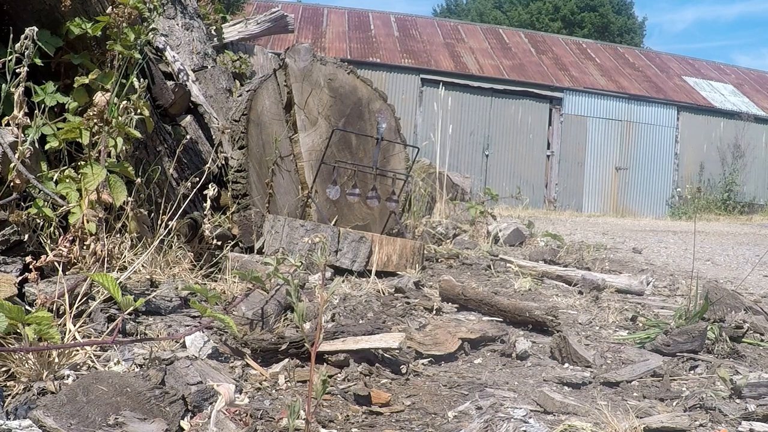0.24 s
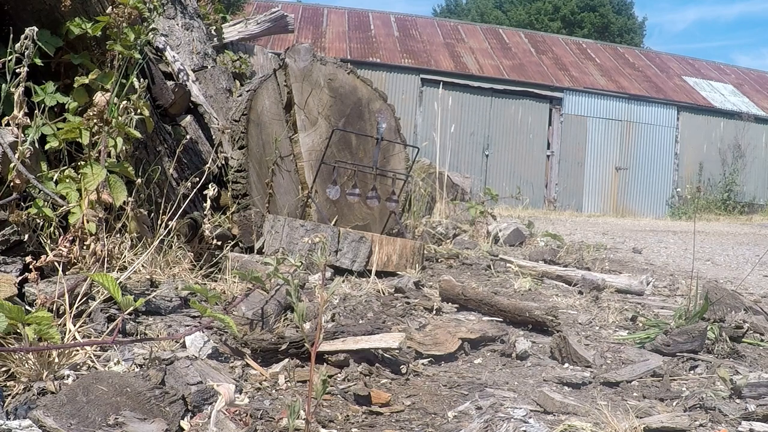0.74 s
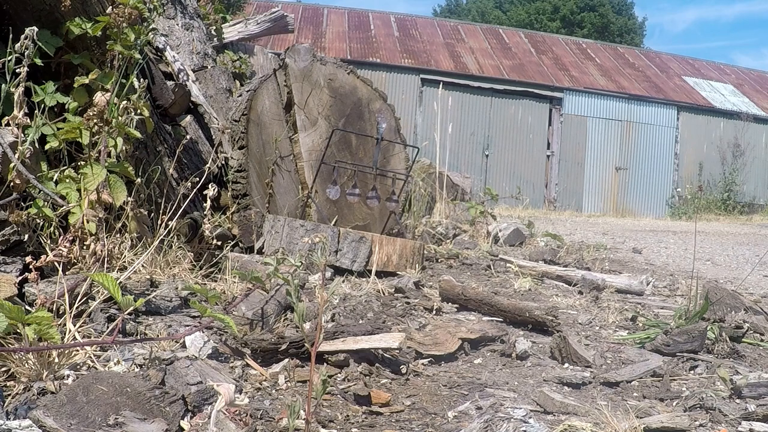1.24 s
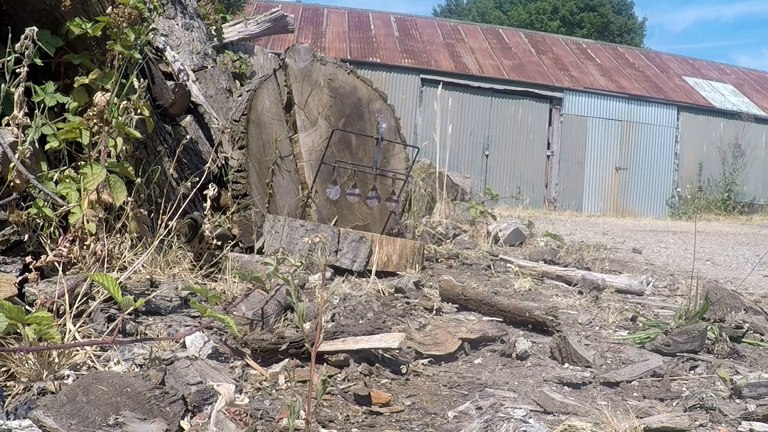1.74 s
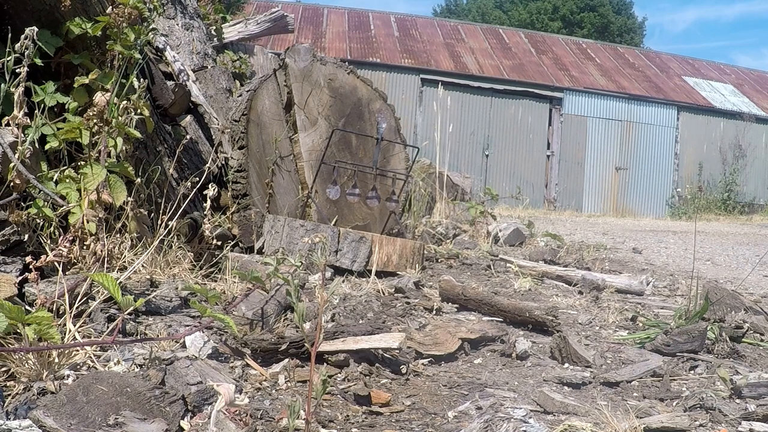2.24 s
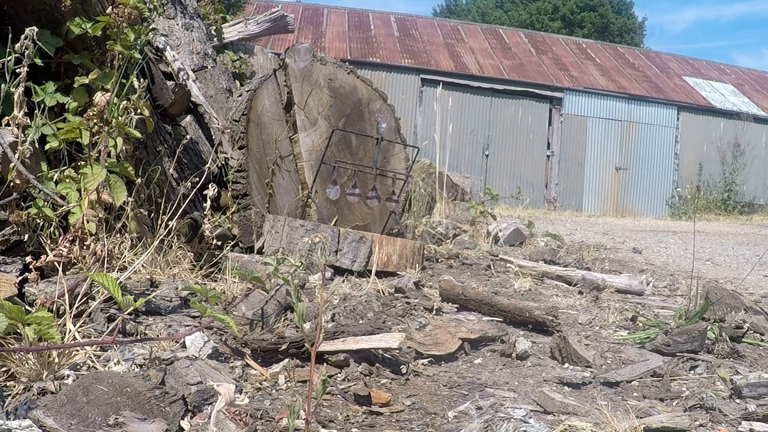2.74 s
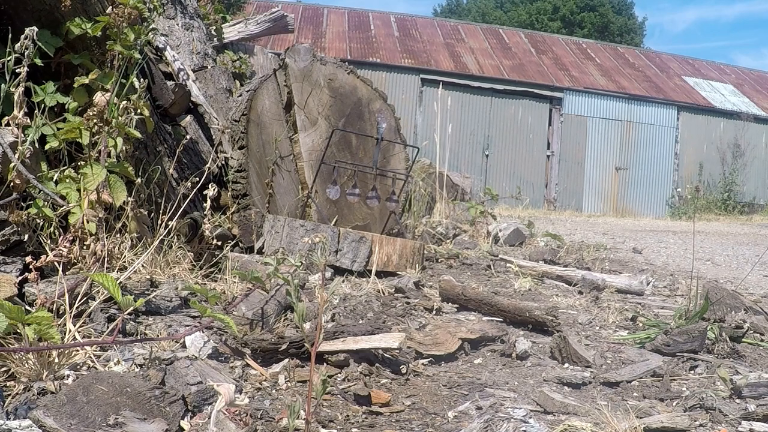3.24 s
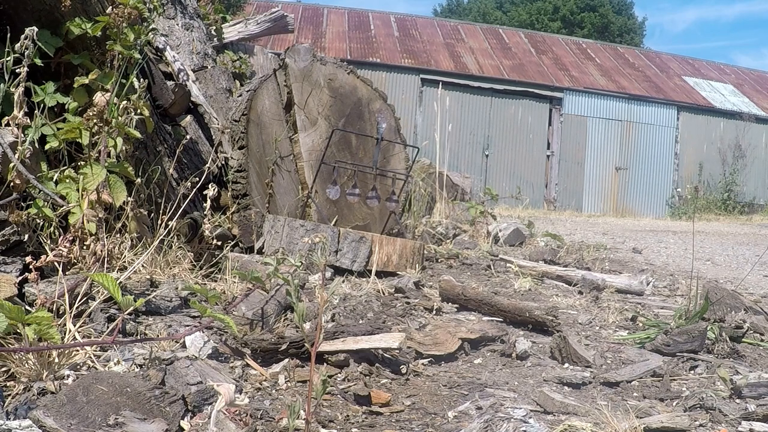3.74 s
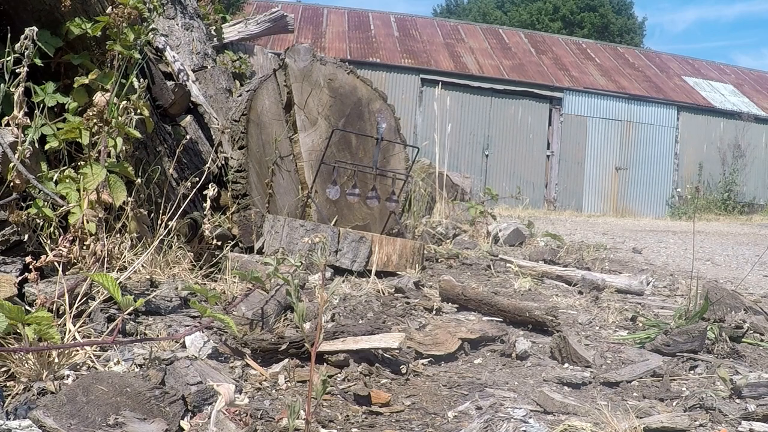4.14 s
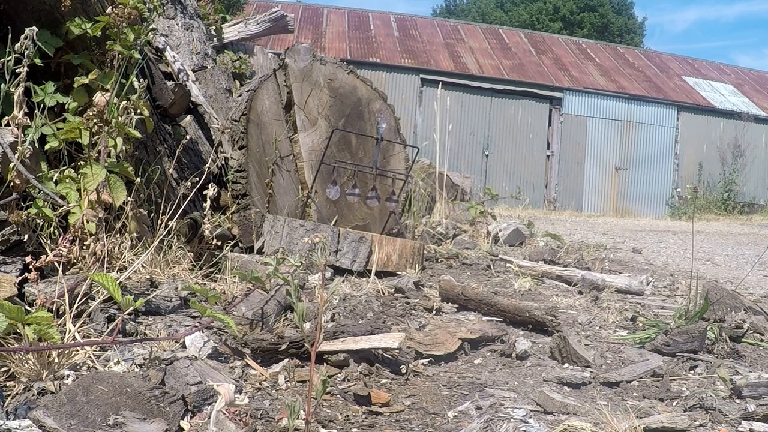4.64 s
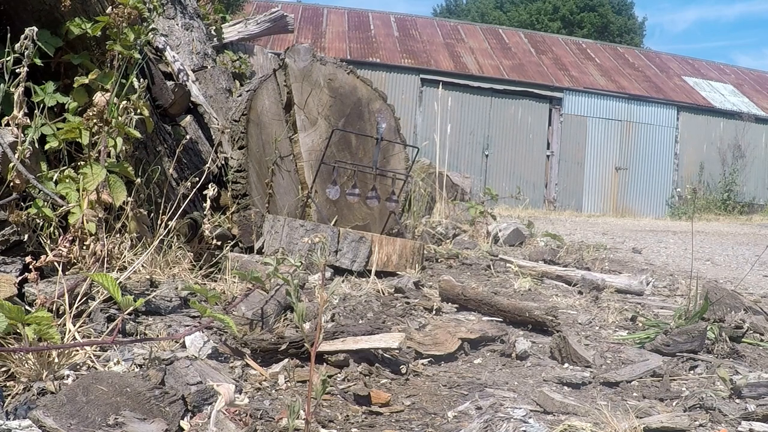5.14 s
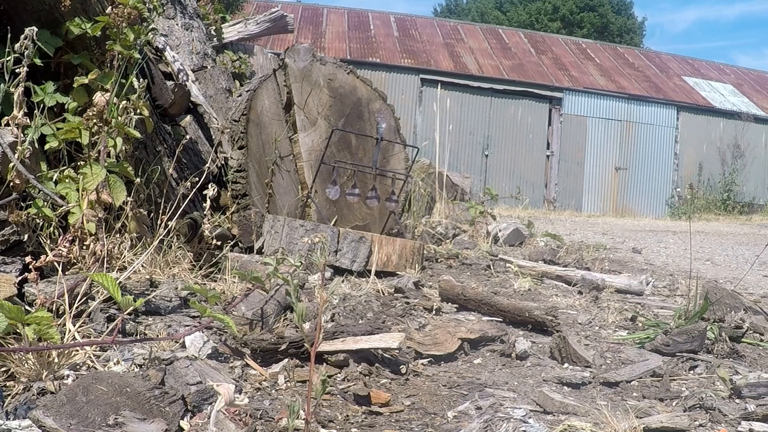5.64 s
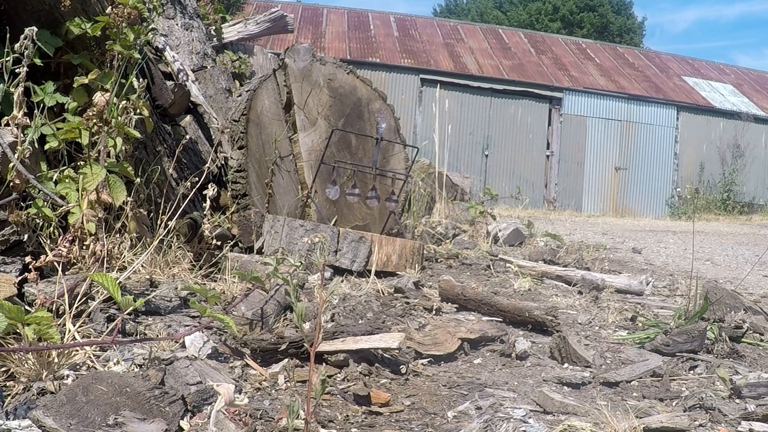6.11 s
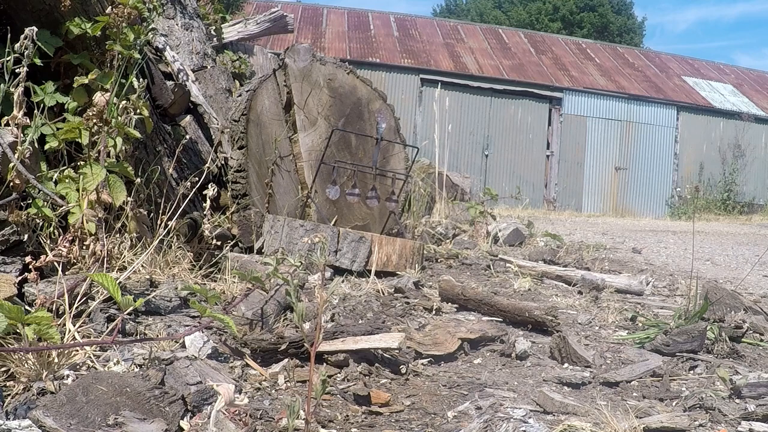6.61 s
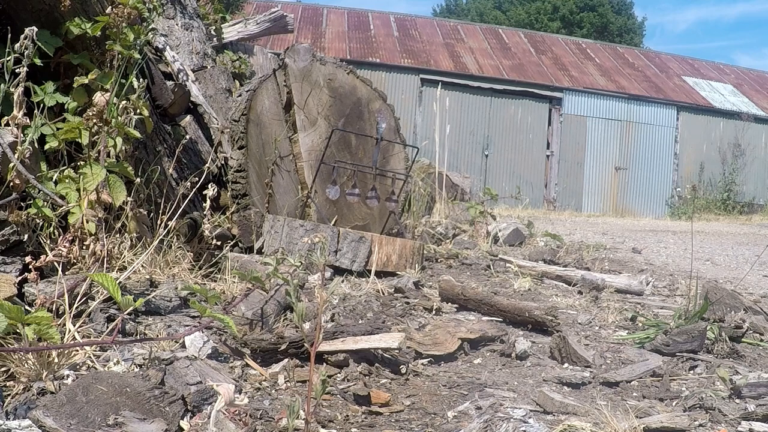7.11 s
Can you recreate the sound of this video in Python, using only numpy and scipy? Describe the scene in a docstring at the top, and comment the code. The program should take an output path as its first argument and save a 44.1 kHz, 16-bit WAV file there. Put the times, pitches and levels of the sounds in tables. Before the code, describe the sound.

A low, uneven aircraft drone dominates, mixed with a distant four-stroke engine's buzzing hum and soft leafy air. The drone thins out around the middle, then swells back strongly. Late on, tiny sharp clicks are followed at once by a hard, dry clank of a pellet on steel, briefly ringing, slightly left, with a short yard reverberation. Stereo microphones lie at ground level beside the target.

```python
"""First a far propeller aircraft drones and sinks in pitch, beside a steady field engine and a tree breeze.
Near the end an air rifle clicks and its pellet clanks on steel, echoed by a metal shed, in a farmyard.
Aircraft: blade tones, throbbing rumble and rush noise. Engine: orders of its four-stroke cycle over a roar.
Breeze, swells, hiss: coloured noise. Hum: low sines. Shot: noise cracks, steel modes and a noise-tail echo.
Heard at two microphone ports on the ground beside the steel pellet target."""
import sys
import numpy as np
from scipy import signal
from scipy.fft import rfft, irfft, next_fast_len
from scipy.io import wavfile
from scipy.ndimage import uniform_filter1d

SR = 44100
rng = np.random.default_rng(int(sys.argv[2]) if len(sys.argv) > 2 else 0)


def bounce(signal):
    """Save signal as a 16-bit WAV file at the path given by the first command-line argument."""
    frames = np.transpose(np.atleast_2d(signal))
    limited = np.clip(frames, -1, 1)
    pcm = np.round(limited * 32767).astype(np.int16)
    wavfile.write(sys.argv[1], SR, pcm)


N = 325017
T = np.arange(N) / SR  # s

# Colours are relative spectra. Levels are before trims, wavers and pan.
# deep hum: f/Hz, level/dB
HUM_TONES = [(18, -55), (30, -50), (54, -64)]
# deep bass gain, sinking in one lull: t/s, gain/dB
BASS_GAIN = [(0, -0.5), (4.85, 1.5), (5.15, -2), (5.6, -11), (6.05, -4), (6.7, -1)]
# deep-bass filter: f/Hz, gain/dB
BASS_FILTER = [(125, 0), (175, -25), (400, -70)]
# microphone hiss colour: f/Hz, density/dB per Hz
HISS_SPECTRUM = [(1000, 0), (3000, 1), (4200, -5), (5000, -2), (6200, 0.5), (7800, -.5), (8050, -3),
                 (8700, -1.5), (10000, -2), (11300, -8), (12500, -8.5), (14000, -16.5), (15000, -28)]
# outdoor air, common to and opposed between the ports: f/Hz, mid/dB per Hz, side/dB per Hz
AIR_SPECTRUM = [(25, 17, 14), (61, 22.5, 16.5), (148, 18, 13), (296, 1, 8.5), (490, 4.5, 8.5),
                (734, 1, 8.5), (1110, -0.5, 6), (1330, -3.5, 2), (1640, -6, -3), (2020, -9.5, -7),
                (2870, -16.5, -16), (4230, -16, -47), (5960, -29, -34), (12000, -54, -52)]
BREEZE_START_DB, BREEZE_RISE_DB_PER_S = -45.5, 0.1761
# airy swells: peak t/s, level/dB, half length/s
AIRY_SWELLS = [(3.551, -56, 0.71), (5.852, -53.5, 0.19), (6.528, -49, 0.14), (6.8, -54, 0.14)]
# swell colour: f/Hz, density/dB per Hz
SWELL_SPECTRUM = [(300, -0.5), (600, -5.5), (950, 0.5), (1200, 2.5), (1450, -9), (3000, -34)]

# engine cycle rate (four-stroke): t/s, rate/Hz
CYCLE_RATE = [(0, 22.92), (2.2, 23.05), (3, 23.12), (4.4, 22.88), (5.2, 22.81), (7.37, 22.82)]
# carry of the engine's upper orders and roar, weighted where used: t/s, level/dB
UPPER_CARRY = [(0, -10.5), (.6, -4.5), (1.35, -5), (1.8, -8.5), (2.4, -1.5), (3.2, -1.5), (3.8, -4.5),
               (4.25, 3.5), (4.6, -0.5), (4.95, 1.5), (5.65, -.5), (6.3, -2.5), (7.37, -3)]
# engine orders: multiple of cycle rate, level/dB
CYCLE_ORDERS = [(2, -66), (4, -52.5), (5, -62), (6, -51.5), (8, -55), (9, -57.5), (10, -66.5), (11, -58),
                (12, -53.5), (13, -65), (14, -65.5), (15, -60), (17, -65), (18, -67.5), (19, -71),
                (20, -59), (22, -61), (23, -65), (24, -72.5), (25, -69.5), (26, -72), (27, -65.5),
                (28, -65), (29, -77), (31, -70), (34, -76.5), (35, -78)]
# sixteenth order, fading on its own: t/s, level/dB
ORDER_16_LEVEL = [(0.0, -57), (0.49, -54.5), (0.84, -63), (1.25, -48.5), (1.31, -62.5), (2.42, -52.5),
                  (3.86, -49.5), (3.9, -66), (3.94, -50), (4.27, -50), (4.66, -59), (6.24, -47.5),
                  (6.57, -48.5), (6.69, -64), (6.9, -45), (7.1, -58), (7.29, -47), (7.37, -51)]
# exhaust roar colour: f/Hz, density/dB per Hz
ROAR_SPECTRUM = [(300, -13), (480, 3), (600, -2), (690, -8.5), (780, -17), (1400, -29), (4000, -61)]

# blade-pass rate, sinking as the aircraft goes by: t/s, f/Hz
BLADE_PASS_RATE = [(0, 96.4), (.5, 94.2), (.9, 94.17), (1.5, 92.97), (2.75, 92.43), (3.3, 91.17),
                   (4.25, 90.57), (4.7, 90.97), (5.3, 88.95), (5.7, 89.03), (6.3, 87.9), (7.37, 86.8)]
# blade-pass tone, swelling and dipping in level: t/s, level/dB
BLADE_1_LEVEL = [(0.0, -29.5), (0.2, -29.5), (0.27, -33.5), (0.53, -25.5), (1.01, -30), (1.09, -41.5),
                 (1.17, -30), (1.29, -39), (1.35, -32.5), (1.56, -41), (1.6, -49), (1.72, -36.5),
                 (1.76, -42), (1.87, -31), (2.63, -26.5), (2.85, -35.5), (3.06, -27.5), (3.59, -37.5),
                 (3.69, -41), (3.76, -33), (3.88, -25), (4.23, -29), (4.66, -32), (4.78, -49),
                 (4.95, -33.5), (5.09, -47), (5.11, -47), (5.21, -39), (5.32, -51), (5.4, -42),
                 (5.54, -42.5), (5.58, -54), (5.79, -36.5), (6.16, -22), (6.53, -26), (6.65, -30),
                 (6.77, -23.5), (6.87, -27), (7.06, -22.5), (7.23, -32), (7.33, -26), (7.37, -26)]
# its octave, fading at other moments: t/s, level/dB
BLADE_2_LEVEL = [(0, -55), (.45, -47), (.55, -42), (.78, -42), (1.12, -59), (1.27, -37.5), (1.45, -39.5),
                 (1.7, -46.5), (1.82, -40.5), (1.95, -55), (2.11, -37), (2.48, -48), (2.62, -35),
                 (2.87, -38.5), (2.99, -35), (3.17, -37.5), (3.26, -49), (3.55, -60), (3.92, -53),
                 (4.03, -37.5), (4.22, -46), (4.6, -43.5), (4.78, -50.5), (5.58, -57), (5.75, -32.5),
                 (5.84, -39.5), (5.93, -32.5), (6.07, -38.5), (6.14, -34), (6.35, -45), (6.44, -36),
                 (6.65, -50), (6.74, -40.5), (6.95, -51)]
# third blade tone: t/s, level/dB
BLADE_3_LEVEL = [(0, -57.5), (.48, -58), (.66, -48), (.88, -69), (1.42, -47), (1.65, -63), (2.35, -55),
                 (2.7, -51), (2.87, -42.5), (3.08, -49.5), (3.6, -66), (5.7, -58), (5.83, -40),
                 (6.0, -46.5), (6.3, -44.5), (6.85, -54.5), (7.15, -46.5), (7.37, -45.5)]
# upper blade tones: multiple of blade rate, level/dB re rumble table at RUMBLE_REF_DB
UPPER_BLADE_TONES = [(4, -17.5), (5, -22.5)]
# upper tones swell faster than the rumble: extra dB per dB above the reference
RUMBLE_REF_DB, UPPER_GROWTH_DB_PER_DB = -45.5, 0.19
# exhaust rumble: t/s, level/dB
RUMBLE_LEVEL = [(0, -53.5), (.8, -48), (1.35, -46), (1.8, -48), (2.3, -46), (2.88, -42.5), (3.6, -45),
                (4.2, -45.5), (4.9, -50.5), (5.6, -47.5), (5.86, -39.5), (6.28, -38), (6.8, -43),
                (7.37, -43)]
# rumble colour: f/Hz, density/dB per Hz
RUMBLE_SPECTRUM = [(30, -19), (60, -0.5), (120, -0.5), (170, 5), (250, -0.5), (330, -2), (400, -4.5),
                   (480, -18), (650, -25.5), (1200, -31), (5000, -86)]
# bass cut on the throbbing rumble: f/Hz, gain/dB
RUMBLE_BASS_CUT = [(30, -11), (110, 0.5)]
# propeller rush colour: f/Hz, density/dB per Hz
RUSH_SPECTRUM = [(200, -18), (550, -9), (850, -5), (1200, 2), (1450, 3), (1620, 7.5), (1820, 4.5),
                 (1980, -16), (3500, -26), (8000, -49)]
# gusts carrying the rush, added to its floor: peak t/s, level/dB, half length/s
RUSH_GUSTS = [(2.81, -60.5, .11), (3.17, -65, 0.21), (4.11, -59, 0.15), (4.62, -63, 0.24), (5.97, -62, 0.4),
              (6.85, -61, 0.32), (7.35, -61, 0.14)]
RUSH_FLOOR_DB = -76.5

# sharp clicks of the shot: t/s, level/dB, t60/s, left minus right/dB
SHOT_CLICKS = [(6.597, -50, .02, -3), (6.6018, -47.5, .05, -3), (6.6585, -38.5, 0.011, -3)]
# click colour: f/Hz, density/dB per Hz
CLICK_SPECTRUM = [(1000, -15), (2200, -2), (3000, -8), (4500, -11), (5400, 4), (6100, -1), (6900, 3),
                  (7900, -11), (10500, -10), (11500, -32), (15000, -50)]
# clanks and rebounds on steel: t/s, level/dB, t60/s, left minus right/dB, brightness/dB per octave
STEEL_CLANKS = [(6.6758, -38.5, 0.018, -7.5, -1.5), (6.6821, -50, .03, -3, 5), (6.6848, -43.5, .035, -3, 5),
                (6.6938, -42, 0.02, -3, -3), (6.6965, -41, .03, -5, -3), (6.7042, -43.5, .02, -4, -2.5),
                (6.711, -47, .03, -4, -1), (6.7165, -47.5, 0.07, -4, -2)]
# clank colour: f/Hz, density/dB per Hz
CLANK_SPECTRUM = [(700, -9), (1400, -7), (1900, 0), (2400, 2.5), (2850, -1.5), (3400, -1), (4200, -7),
                  (5100, -4.5), (5900, -3), (7000, -10.5), (8500, -18), (12000, -42), (15000, -62)]
# modes of the steel target: f/Hz, level/dB within the ring, t60/s
TARGET_MODES = [(1826, -4, .3), (2282, -4, .2), (2412, 0, 0.2), (2487, -7, .25), (2853, -11, .3),
                (3311, -9, .3), (3457, -5, .35), (4630, -11, .2), (5330, -11, .2), (5620, -11, 0.16),
                (5920, -11, 0.13), (6352, -12, .12), (6810, -12, .15)]
RING_DB, GRAIN_SPREAD_DB = -23, 6  # ring trim beside the crack; size spread of crack grains
# dull thud under the clank: t/s, level/dB, t60/s
DULL_THUD = (6.702, -43, .2)
# thud colour: f/Hz, density/dB per Hz
THUD_SPECTRUM = [(250, -25), (400, -13), (470, 2), (540, 3), (700, -22), (1200, -36)]
TOP_HZ = 14700


def undb(db):
    """Decibels to amplitude gain."""
    return 10 ** (np.asarray(db) / 20)


def unit(x):
    """Scale to rms 1."""
    return x / np.sqrt(np.mean(x ** 2))


def curve(rows):
    """Join (s, value) rows by straight lines."""
    return np.interp(T, *np.transpose(rows))


def fading(rows):
    """Gain through (s, dB) points, joined in amplitude: round crests, narrow dips."""
    s, db = np.transpose(rows)
    return np.interp(T, s, undb(db))


def hump(s, half_s):
    """Gaussian rise and fall of height 1; 1/e at half_s from time s."""
    return np.exp(-((T - s) / half_s) ** 2)


def walk(rate_hz):
    """Random levels held 1 / rate_hz and slewed twice; rms 1."""
    k = int(SR / rate_hz)
    steps = np.repeat(rng.standard_normal(N // k + 1), k)
    slewed = uniform_filter1d(uniform_filter1d(steps, k), k)
    return unit(slewed[:N])


def colour(x, points, tilt_db_per_oct=0):
    """Filter by (Hz, dB) points on a log-frequency axis, tilted around 3 kHz."""
    octave = np.log2(np.maximum(np.fft.rfftfreq(x.shape[-1], 1 / SR), 1))
    hz, db = np.transpose(points)
    gain_db = np.interp(octave, np.log2(hz), db) + tilt_db_per_oct * (octave - np.log2(3000))
    return irfft(rfft(x) * undb(gain_db), x.shape[-1])


def noise(points):
    """Coloured Gaussian noise."""
    white = rng.standard_normal(next_fast_len(N, True))
    return colour(white, points)[:N]


def tone(cycles):
    """Sine of rms 1, random starting phase."""
    return np.sqrt(2) * np.sin(2 * np.pi * (cycles + rng.random()))


def rough_tone(cycles, scatter, rate_hz):
    """Tone plus randomly varying in-phase and quadrature parts, as scattered by air; rms 1."""
    turn = 2 * np.pi * (cycles + rng.random())
    in_phase = (1 + scatter * walk(rate_hz)) * np.sin(turn)
    quadrature = scatter * walk(rate_hz) * np.cos(turn)
    return unit(in_phase + quadrature)


def pan(x, left_minus_right_db):
    """Split a level difference evenly between left and right."""
    return x * undb(np.array([[left_minus_right_db], [-left_minus_right_db]]) / 2)


def ports(x, left_minus_right_db, lag_s):
    """Wave that reaches the left port lag_s after the right."""
    left = np.interp(T - lag_s, T, x)
    return pan(np.array([left, x]), left_minus_right_db)


def hiss():
    """Steady microphone hiss, independent in each port."""
    both = np.array([unit(noise(HISS_SPECTRUM)) for _ in range(2)])
    return pan(both, -0.62) * undb(-59.5)


def hum(waver_db=2):
    """Very low sines, each wavering, that sink with the deep bass."""
    tones = sum(tone(hz * T) * undb(db + waver_db * walk(5.3)) for hz, db in HUM_TONES)
    return tones * undb(curve(BASS_GAIN))


def breeze(flicker_db=.5):
    """Diffuse air and leaves, slowly rising; mid and side noise partly opposes the ports."""
    table = np.array(AIR_SPECTRUM)
    mid, side = noise(table[:, [0, 1]]), noise(table[:, [0, 2]])
    air = np.array([mid + side, mid - side])
    air += colour(air, BASS_FILTER) * (undb(curve(BASS_GAIN)) - 1)
    level_db = BREEZE_START_DB + BREEZE_RISE_DB_PER_S * T + flicker_db * walk(12)
    return pan(air, -1.4) * undb(level_db)


def airy_swell():
    """Soft midrange whooshes: coloured noise under Gaussian humps."""
    gain = sum(undb(db) * hump(s, half_s) for s, db, half_s in AIRY_SWELLS)
    return ports(unit(noise(SWELL_SPECTRUM)) * gain, -3.0, 0.00028)


def field_engine(fade_db=2.1, scatter=.17, lurch_cycles=.0012, order_16_trim_db=-3.0,
                 roar_db=-64.5, roar_pulse_rms=.35):
    """Uneven cylinders sound orders of the cycle over a pulsing roar; wind carries the high ones unevenly."""
    cycles = np.cumsum(curve(CYCLE_RATE)) / SR + lurch_cycles * walk(25)
    carry_db = curve(UPPER_CARRY)
    orders = rough_tone(16 * cycles, scatter, 12) * fading(ORDER_16_LEVEL) * undb(order_16_trim_db)
    for multiple, db in CYCLE_ORDERS:
        exposure = (multiple / 22) ** 2
        level_db = db + exposure * carry_db + fade_db * walk(4)
        orders = orders + rough_tone(multiple * cycles, scatter, 12) * undb(level_db)
    pulse = 1 + roar_pulse_rms * tone(cycles)
    roar = unit(noise(ROAR_SPECTRUM)) * pulse * undb(roar_db + 2 * carry_db)
    return ports(orders + roar, 1.6, 0.00014)


def blade_tones(cycles, flutter_db=0.83, octave_scatter=0.076, third_trim_db=-1, third_scatter=0.37,
                upper_scatter=0.56):
    """Multiples of the blade rate; turbulent air breaks up the higher ones more."""
    out = tone(cycles) * fading(BLADE_1_LEVEL) * undb(flutter_db * walk(14))
    out += rough_tone(2 * cycles, octave_scatter, 18) * fading(BLADE_2_LEVEL)
    out += rough_tone(3 * cycles, third_scatter, 22) * fading(BLADE_3_LEVEL) * undb(third_trim_db)
    rumble_db = curve(RUMBLE_LEVEL)
    upper_db = rumble_db + UPPER_GROWTH_DB_PER_DB * (rumble_db - RUMBLE_REF_DB)
    for multiple, db in UPPER_BLADE_TONES:
        out += rough_tone(multiple * cycles, upper_scatter, 28) * undb(upper_db + db)
    return out


def churning(points, churn_db, count=6):
    """Coloured noise whose half-octave bands, from 125 Hz up, surge and fade independently."""
    spectrum = rfft(unit(noise(points)), next_fast_len(N, True))
    hz = np.maximum(np.linspace(0, SR / 2, len(spectrum)), 1)
    place = 2 * np.log2(hz / 125)  # half octaves above 125 Hz
    shares = [np.interp(place, np.arange(count), row) for row in np.eye(count)]
    bands = (irfft(spectrum * share)[:N] * undb(churn_db * walk(16)) for share in shares)
    return unit(sum(bands))


def aircraft(waver_hz=0.3396, churn_db=2.5, rumble_trim_db=-1, scatter_db=-10, throb_rms=0.43):
    """Blade tones over exhaust rumble and gusty rush, both amplitude-modulated at the blade rate."""
    cycles = np.cumsum(curve(BLADE_PASS_RATE) + waver_hz * walk(7)) / SR
    drone = blade_tones(cycles)
    throb = 1 + throb_rms * tone(cycles)
    swell = undb(curve(RUMBLE_LEVEL))
    throbbing = colour(churning(RUMBLE_SPECTRUM, churn_db) * throb, RUMBLE_BASS_CUT)
    rumble = throbbing * swell * undb(rumble_trim_db)
    gusts = undb(RUSH_FLOOR_DB) + sum(undb(db) * hump(s, half_s) for s, db, half_s in RUSH_GUSTS)
    rush = unit(noise(RUSH_SPECTRUM)) * throb * gusts
    # yard scatter: independent rumble at each port
    scattered = np.array([unit(noise(RUMBLE_SPECTRUM)) for _ in range(2)]) * swell * undb(scatter_db)
    direct = ports(drone, 1.45, .00004) + ports(rumble, 4.0, 0.00011) + ports(rush, -1.4, 0.00014)
    return direct + scattered


def decay(t60_s):
    """One-second envelope: 0.5 ms opening, exponential fall of 60 dB per t60_s."""
    age_s = T[:SR]
    opening = np.minimum(age_s / .0005, 1) ** 2
    return opening * np.exp(-np.log(1000) * age_s / t60_s)


def burst(points, t60_s, tilt_db_per_oct=0, grain_db=0):
    """One-second decaying noise crack of uneven grains, independent at each port."""
    grain_gain = undb(grain_db * rng.standard_normal((2, SR)))
    raw = unit(rng.standard_normal((2, SR)) * grain_gain)
    undecayed_rms = np.std(colour(raw, points, tilt_db_per_oct))
    return colour(raw * decay(t60_s), points, tilt_db_per_oct) / undecayed_rms


def steel_ring():
    """Sum of the target's modes, each a decaying sine."""
    return sum(tone(hz * T[:SR]) * decay(t60_s) * undb(db) for hz, db, t60_s in TARGET_MODES)


def add(out, s, sound):
    """Mix a sound in at time s."""
    i = int(s * SR)
    out[:, i:i + sound.shape[1]] += sound[:, :N - i]


def shot(echo_db=-5.0, yard_t60_s=0.45):
    """Clicks, then clanks ringing the same steel over a dull thud, convolved with a noise-tail echo."""
    out = np.zeros((2, N))
    for s, db, t60_s, pan_db in SHOT_CLICKS:
        add(out, s, pan(burst(CLICK_SPECTRUM, t60_s), pan_db) * undb(db))
    for s, db, t60_s, pan_db, tilt_db in STEEL_CLANKS:
        crack = burst(CLANK_SPECTRUM, t60_s, tilt_db, GRAIN_SPREAD_DB)
        clank = crack + undb(RING_DB) * steel_ring()
        add(out, s, pan(clank, pan_db) * undb(db))
    s, db, t60_s = DULL_THUD
    add(out, s, burst(THUD_SPECTRUM, t60_s) * undb(db))
    yard = burst([(500, -8), (3000, 1), (5500, -1.5), (9000, -6.5)], yard_t60_s)
    yard /= np.sqrt(np.sum(yard ** 2) / 2)  # mean energy 1 per port
    echo = signal.fftconvolve(out, yard, axes=1)[:, :N]
    return out + undb(echo_db) * echo


def scene():
    """Sum of all sources at the two ports."""
    return hiss() + hum() + breeze() + airy_swell() + field_engine() + aircraft() + shot()


def record(dry):
    """3 ms linear fades at both ends; the camera's steep low-pass at TOP_HZ."""
    edges = np.minimum(np.minimum(T, T[-1] - T) / .003, 1)
    low_pass = signal.ellip(10, .1, 80, TOP_HZ, fs=SR, output="sos")
    return signal.sosfilt(low_pass, dry * edges)


dry = scene()
out = record(dry)
bounce(out)
```